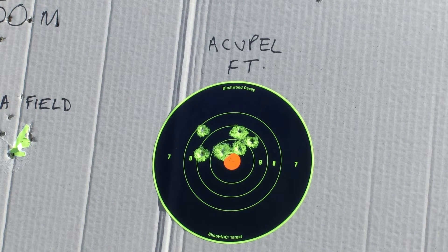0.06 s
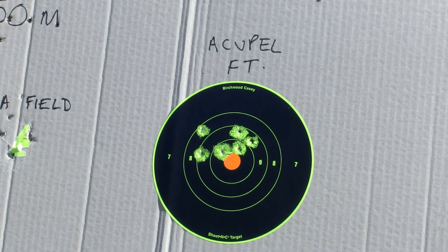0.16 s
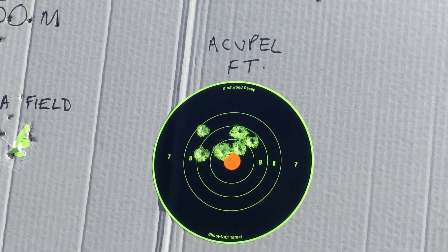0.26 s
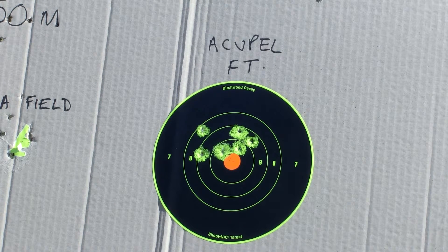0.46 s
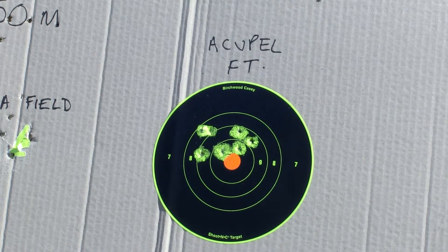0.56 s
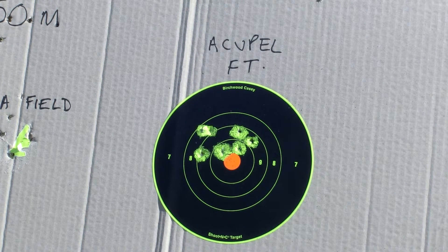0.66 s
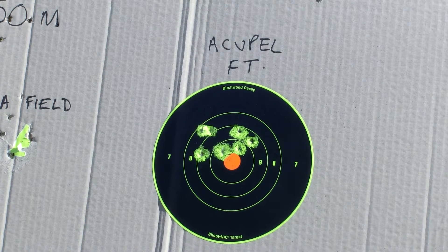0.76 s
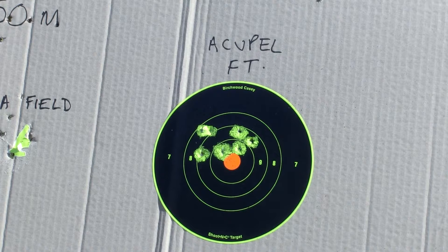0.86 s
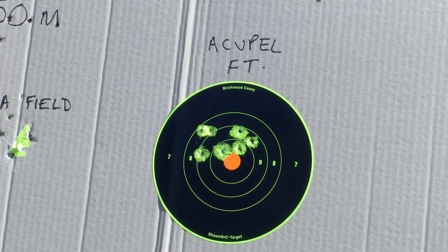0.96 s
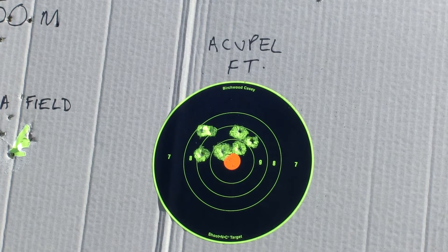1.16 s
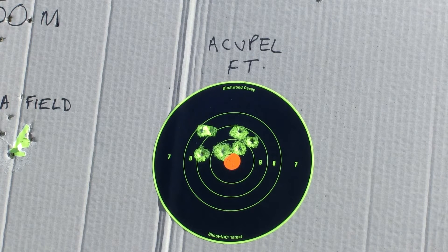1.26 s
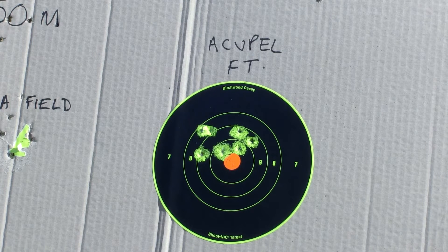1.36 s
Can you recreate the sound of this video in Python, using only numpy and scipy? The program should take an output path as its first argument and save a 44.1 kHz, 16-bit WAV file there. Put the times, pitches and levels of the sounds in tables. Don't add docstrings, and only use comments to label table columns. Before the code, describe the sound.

Wind buffets a stereo microphone beside a cardboard target, then a sharp rifle crack, a brief rising hiss and a very loud, clipped card slap, followed by bright echoes and a suddenly quieter background.

```python
import sys
import numpy as np
from scipy import signal
from scipy.fft import rfft, irfft, next_fast_len
from scipy.io import wavfile
from scipy.ndimage import uniform_filter1d, map_coordinates

SR = 44100
rng = np.random.default_rng(int(sys.argv[2]) if len(sys.argv) > 2 else 0)


def invert_db(level):
    return 10 ** (np.asarray(level, dtype=float) / 20)


def int16_out(signal):
    q = np.round(np.clip(np.atleast_2d(signal).T, -1, 1) * 32767)
    wavfile.write(sys.argv[1], SR, q.astype(np.int16))


N = 61739

SHOT_S, HIT_S = .35948, .54696
DUCK_DB, DEEP_DB = -12, -9


def unit(x):
    return x / np.sqrt(np.mean(x ** 2) + 1e-20)


def along(points, hz):
    f, v = np.transpose(points)
    return np.interp(np.log(hz + 1), np.log(f + 1), v)


def wobble(rate):
    knots = rng.standard_normal(int(N * rate / SR) + 4)
    return map_coordinates(knots, [np.arange(N) * rate / SR])


def filtered(x, response):
    m = next_fast_len(N + SR // 2)
    return irfft(rfft(x, m) * response(np.fft.rfftfreq(m, 1 / SR)), m)[..., :N]


def ring(peaks):
    def response(f):
        return sum((-1) ** k * invert_db(db) * 1j * f * w / (c * c - f * f + 1j * f * w)
                   for k, (c, w, db) in enumerate(peaks))
    return response


def rush(spectrum, alike):
    mid, side = filtered(rng.standard_normal((2, N)), lambda hz: invert_db(along(spectrum, hz)))
    u = np.arccos(np.clip(alike, -1, 1)) / 2
    return unit(np.array([np.cos(u) * mid + np.sin(u) * side, np.cos(u) * mid - np.sin(u) * side]))


def swing(t, hz, life):
    v = np.clip(t * hz, 0, 40)
    return np.sin(2 * np.pi * v) * np.exp(-v / life)


def aim(x, pan_db, lag_s):
    ports = x * invert_db([[pan_db / 2], [-pan_db / 2]])
    return filtered(ports, lambda hz: np.exp(1j * np.pi * hz * lag_s * np.array([[1], [-1]])))


def late(pair, lag_s):
    at = np.arange(N) + np.array([[.5], [-.5]]) * lag_s * SR
    return np.array([map_coordinates(v, [a], order=5) for v, a in zip(pair, at)])


def burst(s, db, hz, length, wide):
    size = 4096
    mid, side = rng.standard_normal((2, size))
    colour = ring([(hz, wide * hz, 0)])(np.fft.rfftfreq(size, 1 / SR)) ** 2
    puff = unit(irfft(rfft([mid + 0.19 * side, mid - .33 * side]) * colour))
    u = np.arange(size) / SR / length
    start = round((s - length) * SR)
    return np.pad(invert_db(db) * puff * u * np.exp(1 - u), [(0, 0), (start, N)])[:, :N]


def tail(x, t60s, gap_s, rise_s, alike):
    noise = rush([(1, 0)], alike)[:, :SR // 2]
    hz, t, z = signal.stft(noise, SR, nperseg=128)
    fade = invert_db(-60 * t / along(t60s, hz)[:, None]) * (1 - np.exp(-t / rise_s))
    h = signal.istft(z * fade, SR, nperseg=128)[1]
    h = h * invert_db(0.65 * wobble(350)[:h.shape[1]])
    delayed = np.pad(x, (round(gap_s * SR), 0))[None]
    return signal.fftconvolve(delayed, h / np.linalg.norm(h[0]), axes=1)[:, :N]


def wind():
    # t/s, level/dB, left minus right/dB
    gusts = [(0.0, -42, 1), (0.054, -45, -13), (0.096, -51, -3.5), (0.144, -48.5, -6), (0.178, -48, -8),
             (0.224, -38, 1), (0.257, -38.5, -8.5), (0.306, -41, 2), (0.339, -38, -10), (0.396, -52, 3),
             (0.536, -52.5, 0), (.6, -63, -1), (0.8, -66.5, 0), (1.05, -61.5, 2), (1.2, -55, 3),
             (1.31, -59.5, 7), (1.342, -72, -3.5), (1.4, -61.5, -8.5)]
    # f/Hz, level per Hz/dB
    rumble = [(12, -32.5), (20, 1.5), (70, 4), (173, -7.5), (273, -16.5), (312, -17.5), (500, -36),
              (650, -60), (1100, -120)]
    # t/s, peak/dB as heard, f/Hz, port (0 left, 1 right), push 1 or suck -1
    thumps = [(.014, -32, 70, 0, 1), (.032, -27.5, 58.3, 1, 1), (0.055, -30.5, 106, 1, -1),
              (.143, -28, 78, 1, 1), (0.167, -37.5, 50.5, 1, 1), (0.188, -19.5, 141, 1, 1),
              (0.1931, -25.5, 252, 1, 1), (.201, -35.5, 80, 1, 1), (0.216, -21, 215, 0, 1),
              (.221, -18.5, 71.4, 0, -1), (.266, -21.5, 121, 0, 1), (.274, -27.5, 118, 1, 1),
              (.292, -21, 156, 0, 1), (0.303, -22.5, 89, 0, 1), (.324, -30.5, 70.4, 1, 1),
              (.341, -24, 55.5, 1, 1), (.401, -41, 80, 0, 1), (0.414, -34.5, 69.4, 1, 1),
              (0.428, -37, 70.6, 0, 1), (0.456, -37.5, 60, 1, 1), (0.464, -36, 50.3, 0, 1),
              (0.489, -38, 39.5, 1, 1), (.678, -45.5, 125, 0, 1), (.752, -41.5, 60.4, 0, -1),
              (0.948, -41.5, 90, 0, -1), (1.182, -39.5, 100, 0, 1), (1.201, -36, 90, 0, -1),
              (1.222, -41, 89.8, 0, 1), (1.238, -41, 80.65, 1, -1), (1.242, -31, 74.6, 0, 1),
              (1.258, -36.5, 79.3, 1, 1), (1.288, -38, 218, 0, 1), (1.308, -44, 121.8, 0, 1)]
    s, level_db, pan_db = np.transpose(gusts)
    t = np.arange(N) / SR
    level_db, pan_db = np.interp(t, s, level_db), np.interp(t, s, pan_db)
    lumps = invert_db(3.2 * np.array([wobble(25), wobble(27)]))
    out = unit(lumps * rush(rumble, alike=.1))
    out = out * invert_db(level_db + 5.5 + np.array([[.5], [-.5]]) * pan_db)
    for at, db, hz, port, push in thumps:
        v = (t - at) * hz
        out[round(port)] += np.sign(push) * invert_db(db) * np.cos(2 * np.pi * v) * np.exp(-(v / 0.6) ** 2)
    return out * invert_db(-np.maximum(duck_db(), DUCK_DB + DEEP_DB))


def far_traffic():
    # f/Hz, level per Hz/dB
    road = [(150, -34.5), (250, -10.5), (518, -8), (917, -4), (997, -3.5), (1490, -15), (1640, -13.5),
            (3000, -37.5), (3900, -55), (6600, -120)]
    # f/Hz, level per Hz/dB
    mic_hiss = [(1180, -31.5), (2000, -5), (3420, -4), (3720, -5), (13600, -9), (15100, -12), (15800, -16)]
    murmur = invert_db(-57.5 + 1.2 * wobble(5.5)) * rush(road, alike=0.66)
    return murmur + invert_db(-65) * rush(mic_hiss, alike=0.12)


def shot():
    # f/Hz, width/Hz, level/dB
    barrel = [(5400, 1600, -6), (9200, 1500, -7)]
    # delay/s, level/dB, f/Hz, length/s
    shot_returns = [
        (.0072, -24.5, 1294, .0003),
        (.0078, -33.5, 4500, .0006),
        (0.0104, -42.5, 2820, .0008),
        (0.0126, -42.5, 8050, 0.0014),
        (0.0137, -30.5, 5900, 0.0008),
        (.0072, -38.5, 8508, 0.0004036),
    ]
    # f/Hz, t60/s
    range_decay = [(250, 0.1203), (700, .15), (2000, 0.33), (12000, .25)]
    shock_s, edge_s, boom_t60 = .000235, .00003, 0.13
    t = np.arange(N) / SR - SHOT_S

    def bump(at, w):
        return np.exp(-((t - at) / w) ** 2)

    front = bump(0, edge_s) + .8 * bump(shock_s, edge_s)
    front = front - .8 * bump(.68 * shock_s, 1.9 * edge_s)
    crack = invert_db(-.5) * (front + filtered(front, ring(barrel)))
    crack = crack - invert_db(-19) * swing(t + .0007, 680, 0.57)
    returns = sum(burst(SHOT_S + s, db, hz, length, wide=0.24) for s, db, hz, length in shot_returns)
    ground = rush([(120, -22.5), (250, -1), (700, -5.5), (2000, -15), (4000, -39)], alike=0.97)
    boom = invert_db(-33 - 60 * np.clip(t, 0, 1) / boom_t60) * (t > 0) * ground
    diffuse = invert_db(-21) * tail(crack, range_decay, 0.00064, 0.0012, alike=.8)
    return late(aim(crack, -1.5, 0) + returns + boom + diffuse, .00002)


def pellet():
    # f/Hz, level per Hz/dB
    wake_hiss = [(470, -43.5), (800, -11), (1650, -20.5), (1990, -15), (2520, -16.5), (3040, -15),
                 (7360, -6), (10700, -0.5), (15800, -8.5)]
    # t/s, lag of the right port/s
    bearing = [
        (.36, .00002),
        (.52, .000023),
        (.527, .00003),
        (.533, .00005),
        (.538, -.00001),
    ]
    pass_s, body_s = .531, 0.0039
    miss_s, leave_s = 0.0083, .0045
    t = np.arange(N) / SR - pass_s
    near = 1 / np.hypot(1, t / np.where(t < 0, miss_s, leave_s))
    flying = (t > SHOT_S - pass_s) & (t < HIT_S - pass_s)
    grain_db = 2 * wobble(600) + .6 * wobble(77)
    wake = unit(rush(wake_hiss, alike=0.61) * invert_db(grain_db))
    whoosh = rush([(200, -25.5), (600, 3), (3500, -11.5), (6000, -19.5)], alike=0.98)
    body = invert_db(-13.5) * whoosh * np.exp(-(t / body_s) ** 2)
    lag_s = np.interp(t + pass_s, *np.transpose(bearing))
    passing = invert_db(-21.5) * late(near ** 1.1 * wake + body, lag_s) * flying
    return passing + burst(.5327, -23, 2200, .0003, wide=2)


def hit():
    # t/s, level/dB, f/Hz, length/s, left minus right/dB
    hit_returns = [(0.595, -27, 3650, 0.0022, 1), (.603, -16.5, 7900, 0.0013, -3.5),
                   (.616, -21.5, 6500, .0015, -1.7), (0.632, -36, 6000, .002, 0),
                   (0.656, -40, 2810, .003, -1), (0.6743, -34.5, 4140, .001, -0.5),
                   (0.6795, -40, 6970, .001, 2), (0.686, -51, 7020, .003, -1),
                   (.73, -43, 8920, .0007, -0.5), (.734, -47.5, 9450, .001, -1.5),
                   (0.744, -51.5, 6000, 0.0014, 2), (0.748, -53, 4000, .0015, -9),
                   (0.757, -56.5, 4500, .002, -1), (0.778, -60, 5000, .002, 0),
                   (.837, -47.5, 1930, .0011, -2), (0.836, -52, 3320, .0007, -3),
                   (.837, -60, 5520, .0006, -2), (.843, -57.5, 2500, .003, 3)]
    # f/Hz, t60/s
    hit_decay = [(300, .3), (800, .35), (2000, 0.38), (4500, 0.32), (10000, .26), (14000, .23)]
    # f/Hz, width/Hz, level/dB
    far_colour = [(6500, 14000, 20)]
    rip_s, rip_hz, rip_end_hz = .00123, 11530, 3000
    slap_s, slap_hz = .00242, 2600
    rattle_s, rattle_t60, murmur_t60 = .02, .16, 0.39
    t = np.arange(N) / SR - HIT_S
    on = (t >= 0) & (t < rip_s)
    u = np.clip(t / rip_s, 0, 1)
    hz = rip_hz - (rip_hz - rip_end_hz) * np.exp(-((u - .76) / .13) ** 4)
    buzz = np.sin(2 * np.pi * np.cumsum(hz * on) / SR)
    tear = buzz + .5 * rush([(300, -12.5), (2000, -5.5), (6000, -1)], alike=0.18)
    slap = swing(t - slap_s, slap_hz, 0.18) + 0.32 * swing(t - slap_s, 1.7 * slap_hz, 1.8)
    body = -invert_db(-2) * 1.5 * slap
    body = body - invert_db(-17) * swing(t, 1070, .9)
    body = body - invert_db(-23.5) * swing(t, 292, 1.5)
    direct = filtered(invert_db(0.5) * on * tear + body, lambda f: 1j * f / (1j * f + 90))
    loose = rush([(300, -4), (1500, -1.0), (3000, -3.5), (6000, -9.5), (13000, -8.5), (16000, -20.5)],
                 alike=0.18)
    rattle = invert_db(-19 - 60 * np.clip(t, 0, 1) / rattle_t60) * (t > 0) * (t < rattle_s) * loose
    dull = rush([(200, -20.5), (400, -1), (1100, -1.5), (2000, -19.5)], alike=1.0)
    murmur = invert_db(-37 - 60 * np.clip(t, 0, 1) / murmur_t60) * (t > 0) * dull
    returns = sum(burst(s, db, f, length, wide=0.00031 * f + 0.65) * invert_db([[pan / 2], [-pan / 2]])
                  for s, db, f, length, pan in hit_returns)
    click = filtered(np.arange(N) == round(HIT_S * SR), ring(far_colour))
    diffuse = invert_db(-14.5) * tail(click, hit_decay, 0.0063, .02, alike=0.28)
    return aim(direct, -1.8, .000006) + rattle + murmur + returns + diffuse


def duck_db():
    recover_s, attack_s = 0.12, 0.013
    t = np.clip(np.arange(N) / SR - HIT_S - .004, 0, None)
    return (DUCK_DB + DEEP_DB * np.exp(-t / recover_s)) * (1 - np.exp(-t / attack_s))


def starve(x):
    # above f/Hz, from t/s
    dropouts = [
        (5300, .5602),
        (2600, .566),
    ]
    end_s, drop_db = .5695, -50
    t = np.arange(N) / SR
    for edge_hz, s in dropouts:
        shut = uniform_filter1d(((t > s) & (t < end_s)) * 1., size=30)
        treble = filtered(x, lambda hz: 1 / (1 + (edge_hz / (hz + 1)) ** 16))
        x = x - (1 - invert_db(drop_db)) * shut * treble
    return x


def scene():
    return wind() + far_traffic() + shot() + pellet() + hit()


def low_pass(x):
    return signal.sosfilt(signal.butter(12, 15900, fs=SR, output="sos"), x)


def record(dry):
    x = filtered(dry * invert_db(duck_db()), lambda hz: 1 / (1 + np.exp((hz - 15700) / 350)))
    clipped = x / (1 + np.abs(x) ** 8) ** (1 / 8)
    return low_pass(starve(clipped))


dry = scene()
out = record(dry)
int16_out(out)
```